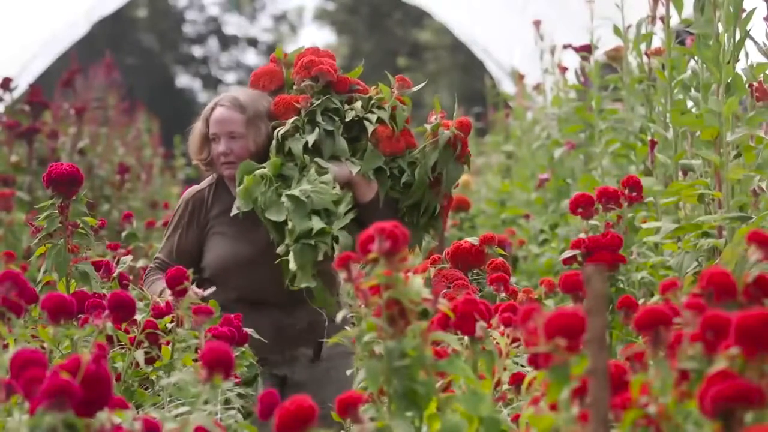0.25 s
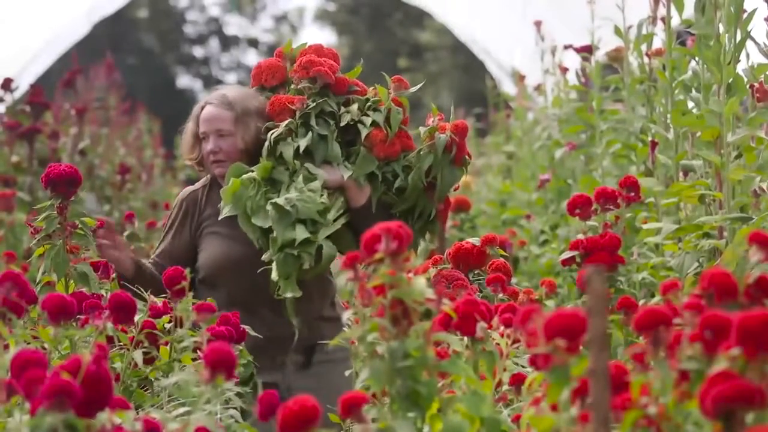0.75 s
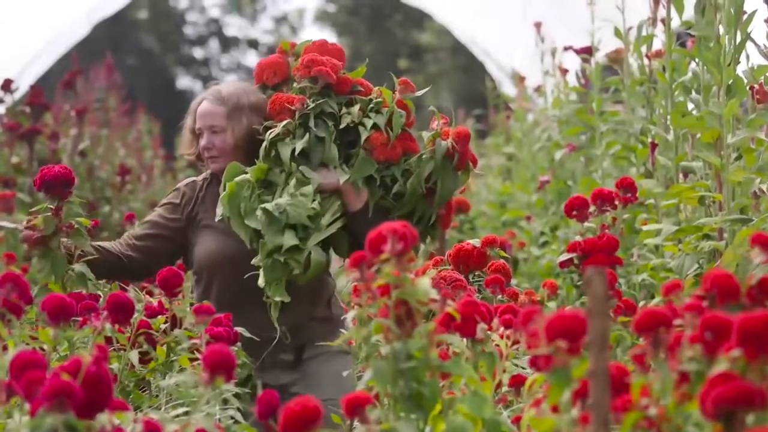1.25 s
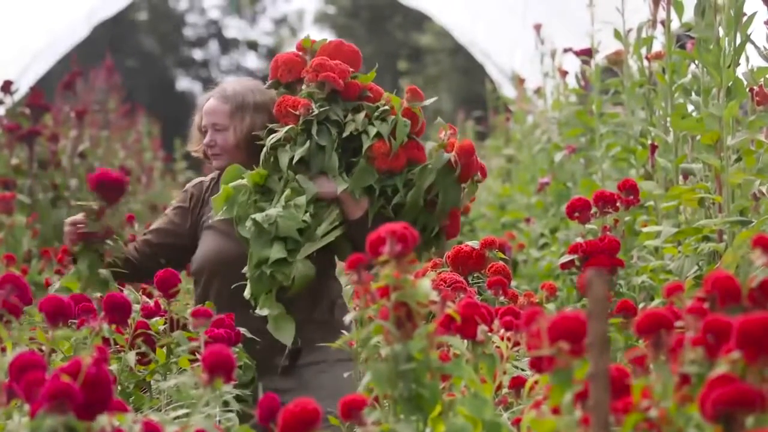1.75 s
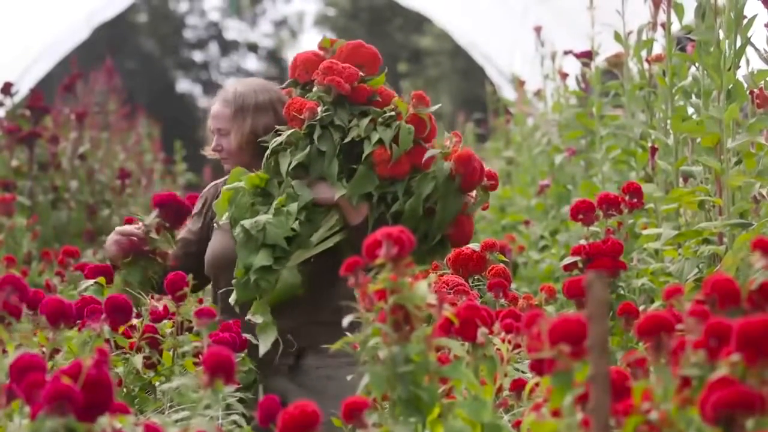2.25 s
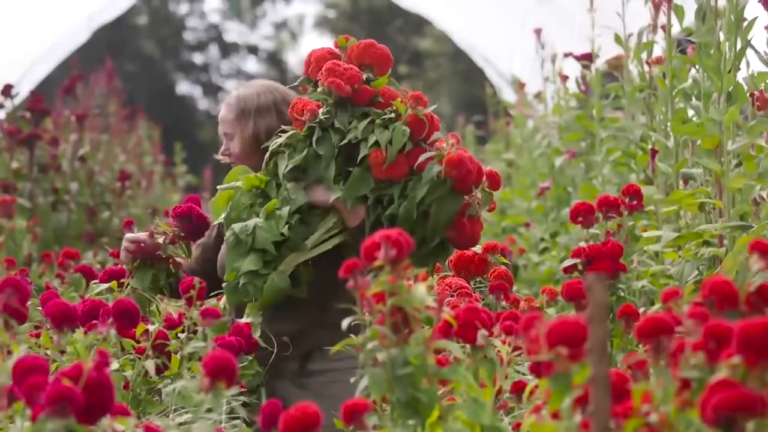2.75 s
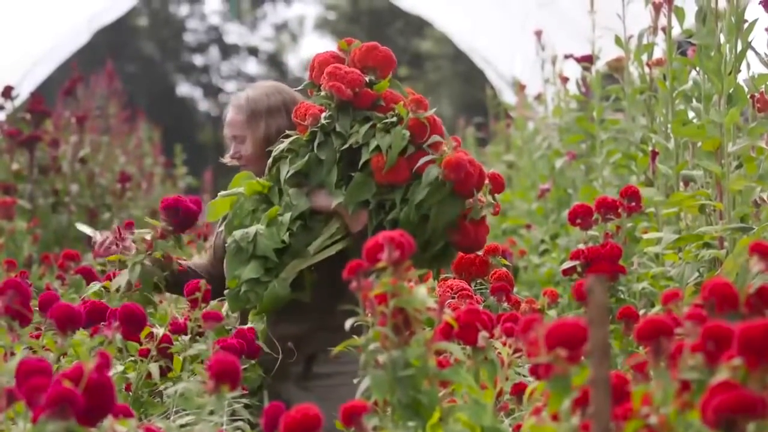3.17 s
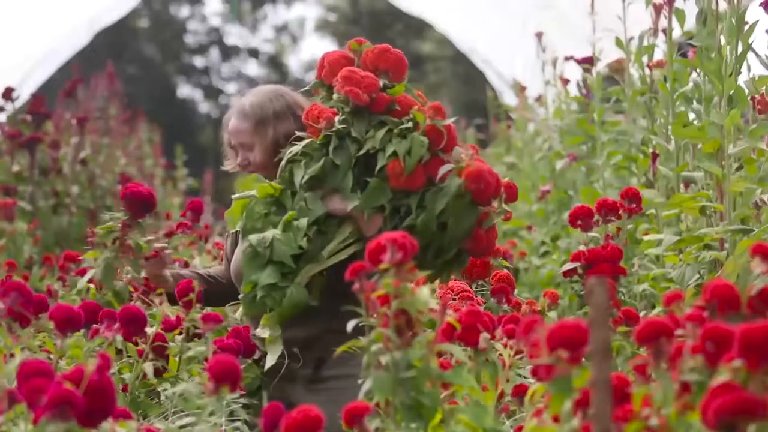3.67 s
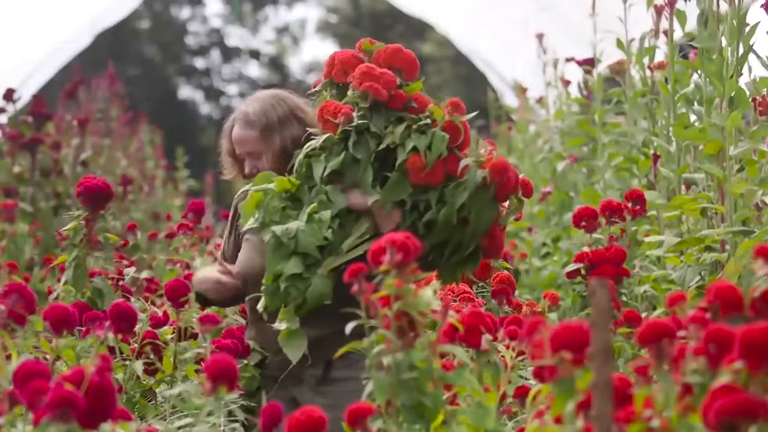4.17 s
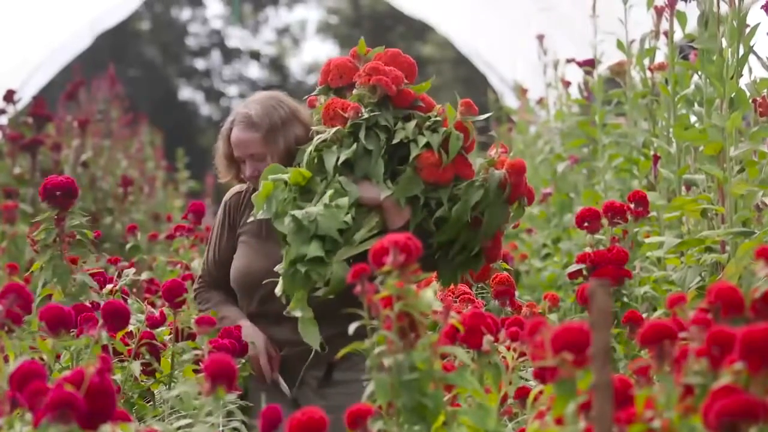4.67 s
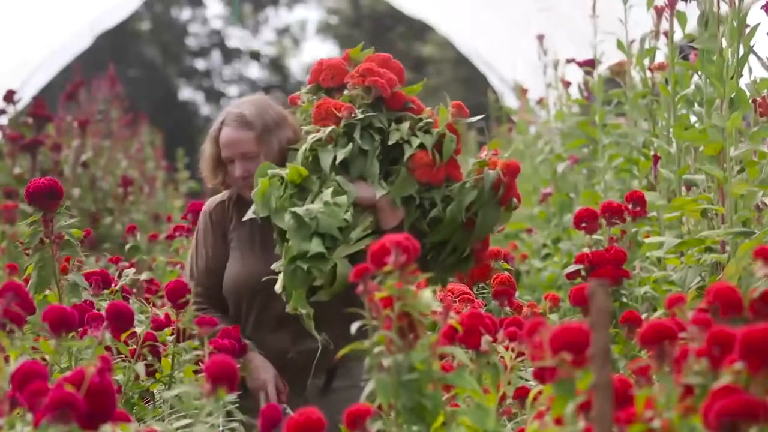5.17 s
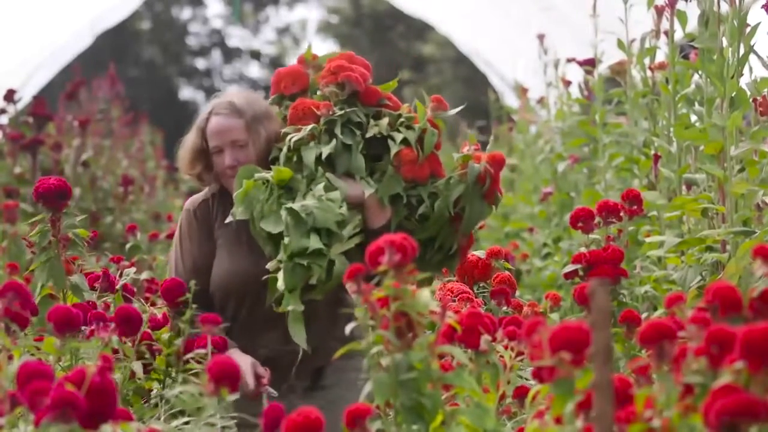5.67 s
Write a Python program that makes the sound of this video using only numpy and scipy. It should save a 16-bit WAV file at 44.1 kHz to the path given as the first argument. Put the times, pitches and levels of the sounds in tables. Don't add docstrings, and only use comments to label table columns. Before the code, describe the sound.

Ground crickets trill piercingly high over a summer flower field while a katydid rasps and flicks about twice a second above soft airy hiss.

```python
import sys
import numpy as np
from scipy import signal
from scipy.fft import rfft, irfft, next_fast_len
from scipy.io import wavfile
from scipy.ndimage import uniform_filter1d

SR = 44100
rng = np.random.default_rng(int(sys.argv[2]) if len(sys.argv) > 2 else 0)


def rack_gain(trim_db):
    fader = np.asarray(trim_db, float)
    return 10 ** (fader / 20)


def pcm_store(signal):
    levels = np.round(np.clip(np.atleast_2d(signal), -1, 1) * 32767)
    wavfile.write(sys.argv[1], SR, levels.astype(np.int16).T)


N = 261890
T, SIZE = np.arange(N) / SR, next_fast_len(N, True)
HZ = np.maximum(np.fft.rfftfreq(SIZE, 1 / SR), 1)

# t/s, peak level/dB, left minus right/dB, level the next rasp reaches/dB
FLICKS = [(-.3, -39, 0, -49), (0.1886, -37, 1.5, -50), (0.7191, -39, 0.5, -48), (1.1643, -34, 4, -51.5),
          (1.6194, -38, 2, -49.5), (2.0667, -35, -0.5, -50), (2.5112, -35, 0.0, -49),
          (2.9597, -35, 1.5, -50.5), (3.3907, -35, 2.0, -47.5), (3.8294, -36, 4, -49.5),
          (4.2667, -35, 3, -49.5), (4.7311, -33.5, -5, -48.5), (5.1881, -35, 0.5, -48.5),
          (5.613, -36, 1.5, -50)]


def crickets():
    # start f/Hz, end f/Hz, share of the cycle sounding, left minus right/dB, right-port lag/rad
    low_cricket = (7810, 7000, .62, -1.5, 1.7)
    high_cricket = (8208, 7950, .56, 1.5, -.7)
    late_cricket = (7750, 7350, .62, -.5, 1.6)
    # t/s, level/dB
    low_song = [
        (0, -36.5),
        (.5, -38.5),
        (1.3, -34.5),
        (2.25, -36),
        (3.1, -36),
        (3.78, -36.5),
        (3.86, -68),
    ]
    high_song = [
        (0, -43.5),
        (2, -41),
        (3.3, -43.5),
        (4.5, -40.5),
        (6, -44.5),
    ]
    late_song = [
        (0, -61),
        (3.5, -52.5),
        (4.5, -42),
        (5.3, -43),
        (5.5, -39.5),
        (5.6, -58),
        (6, -65),
    ]
    # strokes/Hz, start f/Hz, end f/Hz, share sounding, left minus right/dB, lag/rad, level/dB
    far_crickets = [
        (28.67, 7800, 6400, .6, -9, 2.5, -50),
        (30.37, 7900, 7100, .6, 5, 1., -50.5),
        (31.64, 8150, 6400, .55, -4.5, -1.5, -48),
        (33.4, 8050, 6700, .6, 6, 1.5, -49.5),
    ]
    # f/Hz, level/dB per Hz
    wash = [(6000, -43), (6400, -19.5), (6800, -9.5), (7150, -6.5), (7500, -4.5), (7900, -2.5), (8250, -12),
            (8450, -34)]
    # (from t/s, to t/s, rise/Hz)
    singers = [(low_cricket, 29.73, -.02, low_song, (2.3, 3.1, 130)),
               (high_cricket, 32.325, -.57, high_song, (0, 6, 0)),
               (late_cricket, 30.14, 0, late_song, (4.2, 5.3, 150))]
    close = np.zeros((2, N))
    for who, rate, start, song, climb in singers:
        close += cricket(*who, rate * T + start, columns(song)[0], climb=climb)
    hush_s, hush_db = 5.55, -3.5
    fade_db = hush_db * np.clip((T - hush_s) / .1 + .5, 0, 1)
    far = np.zeros((2, N))
    for rate, *who, db in far_crickets:
        strokes = rate * T + .1 * walk(1.2)
        far += cricket(*who, strokes, db + fade_db + 2.0 * walk(1.61), direct=0.18, t60=.2)
    field = hiss(wash, rng.standard_normal((2, N))) * rack_gain(fade_db - 48.0)
    return close + far + field


def cricket(start_hz, end_hz, share, pan_db, lag_rad, strokes, db, direct=0.84, t60=0.15, climb=(0, 1, 0)):
    beat = strokes + .44 * share + 2
    stroke = beat.astype(int)
    chance = rng.standard_normal((300, 4))
    u = np.clip((beat % 1 + 0.02012 * chance[stroke, 0]) / share, 0, 1)
    top_hz = start_hz + np.interp(T, climb[:2], (0, climb[2]))
    hz = (top_hz + (end_hz - top_hz) * u ** 3.3) * (1 + 0.001004 * chance[stroke, 1])
    level_db = 0.8 * chance[stroke, 2] - 3.5 * u ** 4 + 1.27 * walk(300)
    shape = np.sin(np.pi * u ** 0.83) ** 0.55 * rack_gain(level_db)
    phase = 2 * np.pi * np.cumsum(hz) / SR + np.pi * chance[stroke, 3] - np.array([[0], [lag_rad]])
    tone = unit(shape * np.sin(phase))
    return place(scatter(tone * rack_gain(db), direct, t60), pan_db)


def katydids():
    return buzz() + rasp() + flicks()


def buzz():
    # t/s, level/dB
    song = [(0, -44.5), (.4, -44), (1.6, -43.5), (1.67, -49), (2.75, -47), (3.36, -46), (3.6, -44),
            (4.03, -43.5), (4.1, -48), (4.35, -47), (4.48, -50.5), (5.16, -49.5), (5.24, -55), (5.38, -48),
            (5.94, -46.5)]
    # f/Hz, level/dB per Hz
    colour = [(5060, -33), (8600, -1.5), (9420, -6.5), (10900, -3), (11800, -3), (13200, -0.5), (15000, 1),
              (16000, -3.5)]
    rate = 73.5 - .3 * T ** 2
    strokes = 1 + 0.13 * np.sin(2 * np.pi * np.cumsum(rate) / SR)
    teeth = scatter(rng.standard_normal(N), 0.045, t60=.12)
    teeth += .9 * rng.standard_normal((2, N))
    teeth += .4 * rng.standard_normal(N) * np.array([[1], [-1]])
    return place(hiss(colour, teeth * strokes) * rack_gain(columns(song)[0] + 5.5), .5)


def rasp():
    # f/Hz, level/dB per Hz
    colour = [(8000, -29.5), (8600, 0), (9500, 1), (10500, -1), (12000, -8.5), (14000, -19)]
    scrape = rng.standard_normal((2, N)) * rack_gain(0.67 * walk(40))
    return hiss(colour, scrape) * rack_gain(rasp_db() + 3.5)


def rasp_db():
    wait_s, swell_s, stop_s, fall_s, pause_db = 0.055, 0.24, 0.039, 0.043, -8.5
    s, _, _, top_db = np.transpose(FLICKS)
    k = np.searchsorted(s, T, "right") - 1
    swell = np.clip((T - s[k] - wait_s) / swell_s, 0, 1)
    to_next = np.append(s[1:], 9)[k] - T
    stop = np.clip((to_next - stop_s) / fall_s, 0, 1)
    level_db = top_db[k] + pause_db * (1 - np.minimum(np.sqrt(swell), stop))
    return uniform_filter1d(level_db, SR // 100)


def flicks():
    # t/s, peak level/dB, left minus right/dB
    stray_flicks = [
        (4.8354, -41, 1.0),
        (5.035, -41, 1.5),
    ]
    gate = np.zeros((2, N))
    for s, db, pan_db, *_ in FLICKS[1:] + stray_flicks:
        part = near(s, .1)
        age = np.maximum(T[part] - s, 0)
        gate[:, part] += place(rack_gain(db - 4.0) * np.exp(-age / 0.012) * np.minimum(age / 0.004, 1), pan_db)
    snap = rng.standard_normal(N) + 0.33 * rng.standard_normal((2, N))
    return gate * hiss([(7500, -44), (8800, 7), (11500, 3.5), (14000, -12), (16000, -23)], snap)


def bird():
    # t/s from its falling note, length/s, start f/Hz, end f/Hz, level/dB
    phrase = [
        (-.125, .06, 3650, 3600, -6),
        (-.1, 0.04, 3100, 2950, -3.5),
        (0, .03, 2650, 2200, 2),
        (.012, .065, 2226, 2150, 0),
        (0.058, .03, 2960, 2930, -2),
        (0.102, .06, 2590, 2726, 0.5),
        (0.136, 0.045, 2123, 1787, -3.5),
    ]
    # t/s, level/dB, extra level of steep slides/dB (further off they blur)
    phrases = [
        (.275, -52, 0),
        (0.689, -51.5, 0),
        (4.535, -55, -4),
        (4.955, -54, -2.5),
        (5.375, -54, -3.5),
        (5.815, -59.5, -6),
    ]
    steep_hz_per_s = 6000
    song, waver = np.zeros(N), 1 + .019 * walk(200)
    for start, phrase_db, slide_db in phrases:
        for after, length, hz0, hz1, note_db in phrase:
            s = start + after
            steep = abs(hz1 - hz0) > steep_hz_per_s * length
            db = note_db + phrase_db + slide_db * steep
            part = near(s, length)
            u = np.clip((T[part] - s) / length, 0, 1)
            pitch = (hz0 + (hz1 - hz0) * u) * waver[part]
            whistle = np.sin(2 * np.pi * np.cumsum(pitch) / SR)
            song[part] += rack_gain(db) * np.sin(np.pi * u ** 0.57) * whistle
    return scatter(song * rack_gain(7.5 + 2.0 * walk(150)), .68, t60=.3)


def motor():
    # order, middle t/s, half length/s, level/dB
    swells = [
        (1, 0.27, .1, -60),
        (1, 1.38, .3, -65),
        (1, 1.98, 0.29, -63),
        (1, 4.38, 0.37, -67),
        (1, 5.3, 0.5, -65),
        (2, 1.42, 0.47, -69),
        (2, 2.66, 0.44, -62.5),
        (2, 4.27, 0.37, -72),
    ]
    turn = 2 * np.pi * np.cumsum(98.35 * (1 + 0.014 * walk(4))) / SR
    sizes = []
    for k in (1, 2):
        size = rack_gain(-71.5) * np.ones(N)
        for order, s, half, db in swells:
            if order == k:
                size += rack_gain(db) * np.exp(-((T - s) / half) ** 2)
        sizes.append(size)
    sizes.append(rack_gain(-69 + 4.1 * walk(1.15)))
    hum = np.zeros(N)
    for k, size in enumerate(sizes, 1):
        hum += size * rack_gain(0.95 * walk(6.08)) * np.sin(k * turn + k)
    return place(hum, 1.4)


def breeze():
    # t/s, push +1 or pull -1, level/dB, time scale/ms, right port level/dB
    pops = [
        (0.0462, -0.98, -14.5, 0.18, -34),
        (0.089, 1, -18.5, 0.077, -14),
        (0.1926, 0.94, -16.5, 0.27, -15),
        (0.2355, -0.64, -39, 0.2, -10),
        (0.2777, -0.8, -23, 0.23, -13),
    ]
    puffs = [
        (0.0876, 1, -29, 1.6, -24),
        (.2135, 1, -36, 1.4, -15),
        (0.235, -0.99, -30.5, 1.3, -22),
        (.321, -0.97, -44, 1.5, -14),
    ]
    out, t = np.zeros((2, N)), T[:SR // 2]
    for s, sign, db, ms, right_db in pops:
        u = np.clip((t - s) / (ms / 1000), 0, 60)
        pulse = sign * u ** 1.4 * np.exp(1.5 - 1.48 * u)
        out[:, :len(t)] += pulse * rack_gain(np.array([[db + 1.0], [db + right_db]]))
    for s, sign, db, ms, right_db in puffs:
        u = (t - s) / (ms / 1000)
        pulse = sign * (1 - u ** 2 / 2) * np.exp(-u ** 2 / 4)
        out[:, :len(t)] += pulse * rack_gain(np.array([[db], [db + right_db]]))
    vent = signal.butter(1, 110, "high", fs=SR, output="sos")
    return signal.sosfilt(vent, out)


def rumble():
    top_hz = 55
    band = signal.butter(3, [top_hz / 3, top_hz], "band", fs=SR, output="sos")
    low = signal.sosfilt(band, rng.standard_normal((2, N)))
    return place(unit(low) * rack_gain(-70 - 3.5 * T + 3.4 * walk(2.6)), 8)


def air():
    # f/Hz, level/dB per Hz
    colour = [(12, -60), (40, -22), (87, -6.5), (162, -8), (300, -2.5), (560, -0.5), (875, -4),
              (1300, -6.5), (2500, -9), (3290, -7), (3900, -10), (5200, -12), (6300, -12), (8190, -39)]
    # f/Hz, left-right correlation
    likeness = [(60, 0.82), (130, 0.74), (300, 0.41), (1400, 0.48), (3100, 0.33), (5000, 0.), (6300, -0.28),
                (7500, 0.63)]
    leaves = rack_gain(1.0 * rng.exponential(size=N) + 0.64 * walk(60))
    mid, side = rfft(rng.standard_normal((2, N)) * leaves, SIZE)
    like = np.clip(over_hz(likeness, HZ), -.95, .95)
    pair = np.sqrt(1 + like) * mid + np.sqrt(1 - like) * side * np.array([[1], [-1]])
    pair = pair * rack_gain(over_hz(colour, HZ))
    rush = np.zeros((2, N))
    for octave in range(4, 15):
        share = np.clip(1 - np.abs(np.log2(HZ) - octave), 0, 1)
        rush += irfft(pair * share, SIZE)[:, :N] * rack_gain(0.48 * walk(6))
    return unit(rush) * rack_gain(-46 - 0.36 * T + 1 * np.exp(-T / 0.34))


def scatter(x, direct, t60):
    t = T[:int(t60 * SR)]
    tail = rng.standard_normal((2, len(t))) * rack_gain(-60 * t / t60)
    tail *= np.sqrt(1 - direct) / np.linalg.norm(tail, axis=1, keepdims=True)
    tail[:, 0] = np.sqrt(direct)
    return signal.oaconvolve(x * np.ones((2, 1)), tail, axes=1)[:, :N]


def place(x, pan_db):
    return x * rack_gain(np.array([[.5], [-.5]]) * pan_db)


def hiss(colour, excite):
    return unit(irfft(rfft(excite, SIZE) * rack_gain(over_hz(colour, HZ)), SIZE)[..., :N])


def walk(rate):
    k = int(SR / rate)
    held = np.repeat(rng.standard_normal(N // k + 1), k)
    return 1.3 * uniform_filter1d(uniform_filter1d(held, k), k)[:N]


def unit(x):
    return x / np.sqrt(np.mean(x ** 2))


def columns(table):
    s, *rest = np.transpose(table)
    return [np.interp(T, s, c) for c in rest]


def over_hz(table, hz):
    f, value = np.transpose(table)
    return np.interp(np.log(hz), np.log(f), value)


def near(s, length):
    return slice(max(int(s * SR), 0), int((s + length) * SR))


def starve(x, lo_bin, bands, width):
    # f/Hz, rounding step over band rms/dB
    coarseness = [(2000, -2), (3000, 5.5), (4000, 9.5), (6500, 12), (7000, 6)]
    n, k = np.arange(2048), lo_bin + np.arange(bands * width)
    window = np.sin(np.pi * (n + .5) / 2048)
    basis = window * np.cos(np.pi / 1024 * (n + 512.5) * (k[:, None] + .5))
    where = 373 + 1024 * np.arange(N // 1024 - 2)[:, None] + n
    lines = (x[:, where] @ basis.T).reshape(2, len(where), bands, width)
    usual = uniform_filter1d(np.sqrt((lines ** 2).mean((0, 3))), 9, axis=0)
    coarse_db = over_hz(coarseness, (k[::width] + width / 2) * SR / 2048)
    coarse_db = coarse_db + 5.5 * uniform_filter1d(rng.standard_normal(usual.shape), 2, axis=0)
    step = (usual * rack_gain(coarse_db))[..., None]
    lost = lines - np.sign(lines) * np.floor(np.abs(lines) / step + .4) * step
    blocks = lost.reshape(2, len(where), -1) @ basis / 512
    out = x.copy()
    for half in (slice(0, 1024), slice(1024, 2048)):
        out[:, where[:, half]] -= blocks[..., half]
    return out


def scene():
    return crickets() + katydids() + bird() + motor() + breeze() + rumble() + air()


def band_limit(x):
    return signal.sosfilt(signal.butter(12, 16940, fs=SR, output="sos"), x)


def record(dry):
    top = signal.ellip(12, .2, 70, 15720, fs=SR, output="sos")
    thin = starve(signal.sosfilt(top, dry), 96, bands=19, width=12)
    return band_limit(thin)


dry = scene()
out = record(dry)
pcm_store(out)
```